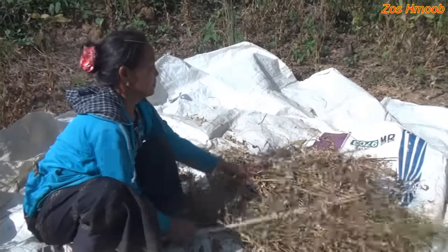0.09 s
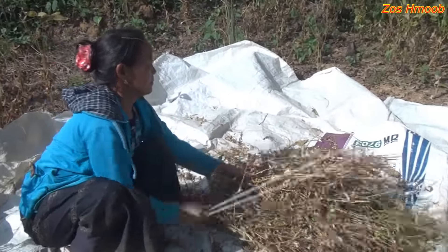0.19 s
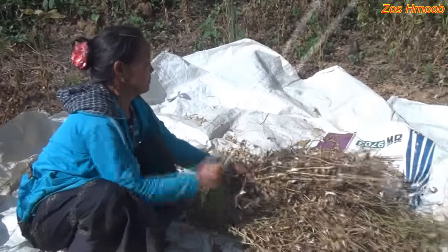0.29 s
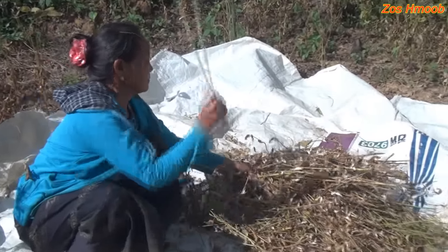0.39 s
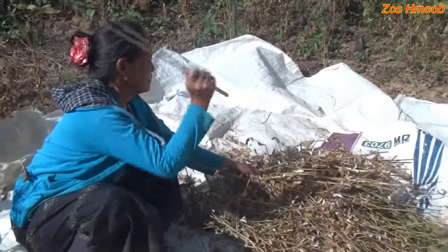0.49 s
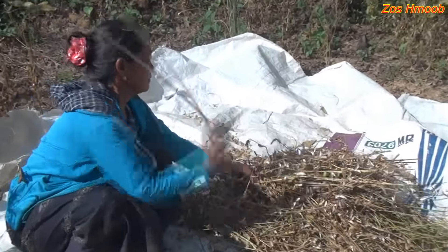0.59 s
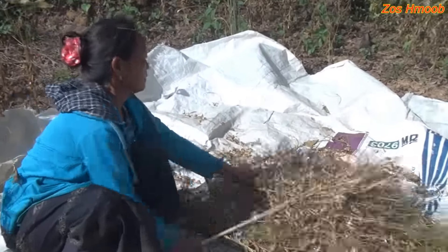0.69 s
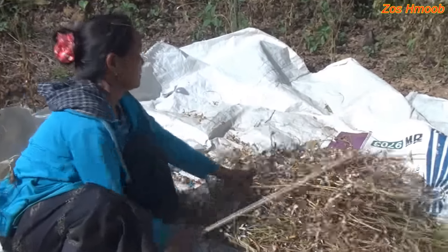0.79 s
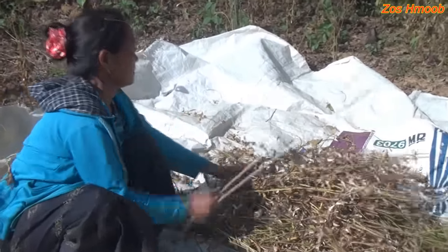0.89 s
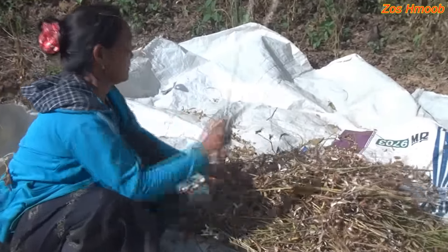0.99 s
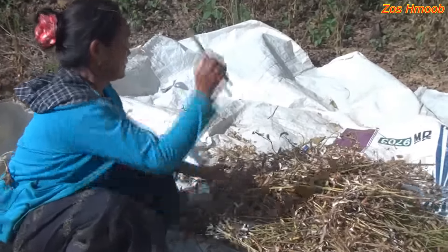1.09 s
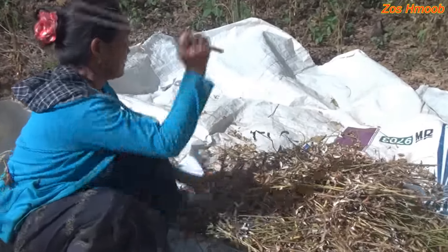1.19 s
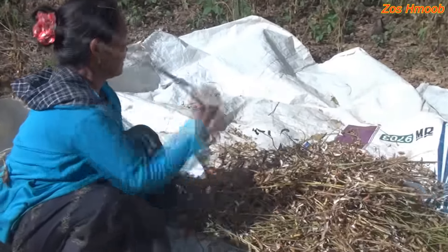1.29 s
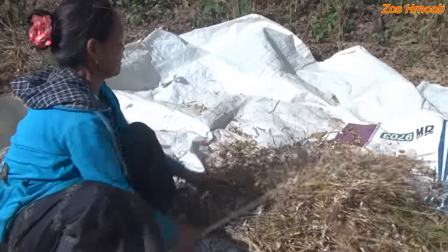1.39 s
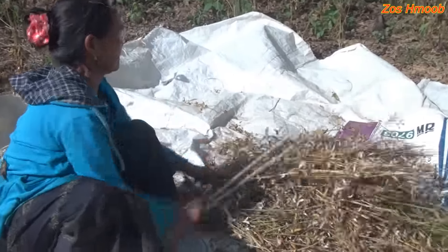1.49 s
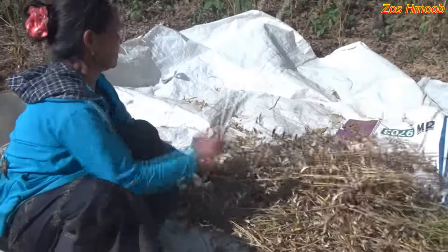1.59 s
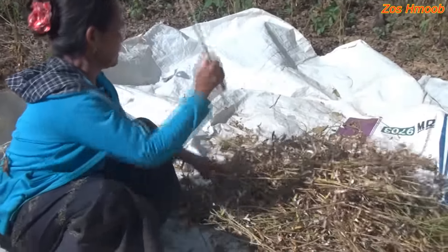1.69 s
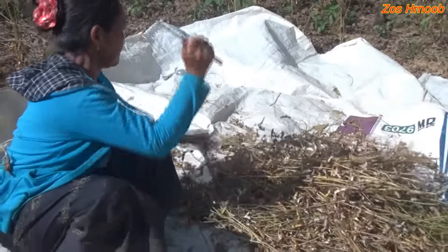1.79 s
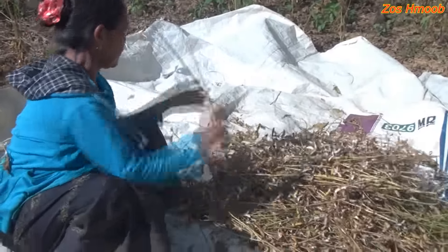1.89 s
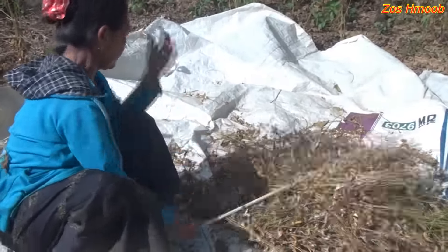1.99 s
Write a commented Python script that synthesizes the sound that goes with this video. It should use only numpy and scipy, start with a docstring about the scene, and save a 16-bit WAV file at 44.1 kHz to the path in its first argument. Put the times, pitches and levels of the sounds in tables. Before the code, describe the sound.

Sticks thresh a heap of dried stalks outdoors: brief swishes lead into three sharp, crackling blows, each trailing crunch, rattling pods and scattered ticks. Close stereo microphone, heap to the right, very soft open air behind.

```python
"""Dried stalks rustle and tick to the right, then two thin sticks swish down together three times on their heap
on a tarp. Each blow is a burst of dense random snaps over a dull noise thud, thinning into crunch and rattling
pods. Between blows, damped rings make single ticks and finer snaps make the rustle; a rough tone for each stick
makes the swish. An insect trills far off as a pulsed, roughened sine, over soft outdoor air of coloured noise."""
import sys
import numpy as np
from scipy import signal
from scipy.fft import rfft, irfft, next_fast_len
from scipy.io import wavfile
from scipy.ndimage import map_coordinates

SR = 44100
rng = np.random.default_rng(int(sys.argv[2]) if len(sys.argv) > 2 else 0)


def output_pcm(signal):
    """Save a mono or channel-first signal as 16-bit PCM at the path in sys.argv[1].

    Samples are clipped to [-1, 1] before scaling.
    """
    pcm = np.clip(np.atleast_2d(signal).T, -1, 1) * 32767
    wavfile.write(sys.argv[1], SR, np.round(pcm).astype(np.int16))


def convert_level_to_amplitude(level_db):
    """Map a level in decibels to its linear amplitude factor."""
    exponent = np.asarray(level_db, float) / 20
    return 10 ** exponent


N = 88200
T = np.arange(N) / SR

# Levels are those of the dry layers, before slow wavering and stereo placing; spectra are relative.
# contacts of the sticks with the heap: (time [s], level [dB], rise [s], burst t60 [s], low thud level [dB])
STICK_CONTACTS = [(0.21, -22.5, 0.00033, 0.011, -56), (0.2116, -13, 0.0011, 0.059, -39),
                  (0.2138, -15, 0.0013, 0.09, -48), (0.8215, -13.5, 0.0027, 0.047, -33.5),
                  (0.8245, -13.5, 0.0012, 0.066, -32), (1.537, -13, 0.0033, 0.063, -34),
                  (1.541, -18.5, 0.001, 0.058, -38), (1.552, -32, .004, 0.43, -28.5)]
# the heap crunching on after each blow: (time [s], level [dB], t60 [s])
HEAP_CRUNCH = [(0.215, -20, .25), (0.828, -22.5, 0.31), (1.543, -21.5, 0.22)]
# colour of the cracks in a burst: (frequency [Hz], density [dB per Hz])
CRACK_SPECTRUM = [(88, -54), (150, -63), (738, -12.5), (1360, -18.5), (3560, -5), (5480, -5), (9890, -2.5),
                  (13800, -5.5), (15600, -12.5), (16500, -43)]
# colour of the crunch: (frequency [Hz], density [dB per Hz])
CRUNCH_SPECTRUM = [(59, -48), (100, -12), (797, -5), (1370, -8), (1920, -3.5), (2630, -17.5), (2920, -5),
                   (7510, -6), (9260, -2), (15000, -13.5)]
# colour of the dull thud: (frequency [Hz], density [dB per Hz])
THUD_SPECTRUM = [(60, -7), (120, -8), (300, -21.5), (700, -4.5), (1500, -20.5), (3000, -69), (6000, -48)]
# swishes of the sticks through the air: (end time [s], length [s], level [dB], first pitch [Hz], last pitch [Hz])
STICK_SWISHES = [(0.214, 0.097, -47.5, 139.7, 261), (0.81, 0.0716, -42, 111.7, 275),
                 (1.543, 0.081, -39, 144.8, 268)]
# colour of the whoosh around the swish tones: (frequency [Hz], density [dB per Hz])
WHOOSH_SPECTRUM = [(80, -26), (150, -5.5), (300, -0.5), (500, -9), (800, -8), (1200, -11), (3000, -21.5),
                   (8000, -27), (15000, -36)]
# snaps and ticks: (time [s], level [dB], pitch [Hz], length [s], pitch spread to either side [octaves])
STALK_TICKS = [(.0066, -29, 9540, .002, 0.26), (0.0123, -27, 8900, 0.00054, 1.1),
               (0.024, -32, 10300, .0015, 0.25), (0.0345, -24.5, 8770, 0.0016, 0.23),
               (0.048, -31, 7240, 0.00076, 1.3), (0.055, -30, 9400, 0.0013, 0.74),
               (0.062, -28, 7150, 0.001, 0.2), (0.086, -33, 6500, 0.0022, 1.2),
               (0.092, -27, 7600, 0.0035, 0.84), (0.102, -31, 8750, 0.001, 0.3),
               (0.107, -28, 6530, 0.0032, 1.3), (.1205, -34, 5040, 0.0011, 0.32),
               (0.1415, -29, 7600, .002, 0.82), (0.265, -24.5, 5230, 0.0023, 0.33),
               (0.274, -29, 4260, 0.0016, 0.36), (0.311, -40, 4500, 0.006, 0.19),
               (0.3215, -36, 4460, .003, 0.23), (.33, -33, 10400, 0.0012, 0.15),
               (.3345, -31.5, 10200, .0015, 0.11), (0.34, -30, 10500, .0008, 0.23),
               (0.350, -38, 4140, 0.005, 0.15), (0.3735, -37.5, 5560, 0.0024, 0.64),
               (0.406, -33.5, 9800, 0.00092, 0.49), (0.5, -27, 4970, 0.0018, .22),
               (0.5025, -35.5, 4500, 0.0057, 0.17), (.5145, -36, 4470, 0.0017, .1),
               (0.529, -47.5, 4580, 0.003, .12), (.7215, -43, 4500, 0.0025, 1.04),
               (0.7294, -42, 5000, 0.0019, 0.94), (0.826, -11.5, 3660, 0.001485, 0.33),
               (0.8815, -21, 1960, 0.0015, 0.77), (0.9065, -26, 2160, 0.0019, 1.23),
               (0.9128, -33.5, 2340, 0.0024, 0.6), (0.961, -36.5, 4030, 0.0016, 1.65),
               (1.048, -40.5, 1780, 0.0019, 1.6), (1.117, -38.5, 5100, 0.0011, 0.61),
               (1.1424, -41.5, 2550, 0.0025, .7), (1.149, -41.5, 3460, .003, 0.36),
               (1.188, -41, 7800, 0.0026, 0.17), (1.232, -46, 4000, 0.00073, 0.98),
               (1.3255, -41, 4470, .002, 0.16), (1.333, -42.5, 4500, .007, 0.23),
               (1.333, -47.5, 1830, 0.0054, 0.096), (1.343, -49, 4600, 0.0044, 0.14),
               (1.353, -47, 4850, 0.0025, 0.27), (1.38, -50, 1700, 0.0052, 0.54),
               (1.405, -49, 3780, 0.0021, 0.56), (1.4165, -41, 1930, 0.0043, 0.88),
               (1.4336, -44, 2300, 0.0018, 0.24), (1.4432, -36, 2130, 0.0028, 0.67),
               (1.449, -39.5, 3700, 0.003, 0.77), (1.453, -38, 3540, 0.0058, 1.1),
               (1.5575, -28, 1190, 0.001, 1.1), (1.5611, -15.5, 1950, 0.00059, 1.14),
               (1.631, -25.5, 8550, 0.0029, 0.29), (1.625, -30, 6030, 0.0017, 0.54),
               (1.758, -46, 4170, 0.0025, 0.36), (1.777, -45, 4130, 0.0032, 0.11),
               (1.80, -45, 3630, 0.0029, 0.18), (1.821, -43.5, 3980, 0.0023, 0.44),
               (1.976, -49.5, 3500, 0.0011, 0.99)]
# loose stalks rustling and settling: (time [s], level [dB], treble raised and the rest lowered by [dB])
STALK_RUSTLE = [(0, -42.5, 4.5), (.1, -44, 3), (.15, -44.5, 0.5), (.17, -47.5, -0.5), (.21, -44.5, -5.5),
                (.33, -43.5, -0.5), (.42, -48.5, -3), (.49, -50, -1.5), (.55, -59, -7.5), (.7, -58.5, -6),
                (.728, -52, 5), (.75, -54, -8), (.82, -46, -4.5), (.96, -46.5, -4.5), (1.05, -50.5, -0.5),
                (1.09, -55.5, -4.5), (1.15, -55, -8.5), (1.25, -53, 2.5), (1.3, -57, -3.5),
                (1.37, -59, -8.5), (1.39, -49, -1), (1.43, -52.5, -4.5), (1.456, -46.5, -4),
                (1.47, -54.5, -4.5), (1.54, -54.5, 0), (1.65, -57.5, -16.5), (1.72, -50, -3.5),
                (1.819, -51.5, -0.5), (1.86, -58, 0.5), (2, -71, -14)]
# colour of the rustle: (frequency [Hz], density [dB per Hz])
STRAW_SPECTRUM = [(120, -18), (200, -13), (364, -4), (615, -9), (807, -7.5), (3630, -4.5), (6730, -5),
                  (7770, -3), (12500, -4.5), (15200, -11)]
# swell of the nearer insect: (time [s], level [dB])
INSECT_LEVEL = [(0, -76), (.5, -60.5), (.8, -67.5), (1.1, -66), (1.5, -64), (1.7, -64), (1.85, -70),
                (2, -84)]
# colour of the outdoor air: (frequency [Hz], density [dB per Hz])
AIR_SPECTRUM = [(15, -45), (25, 2), (320, -2.5), (774, 2), (885, 0), (1160, -2), (1360, -4.5), (2200, -3.5),
                (6270, -9.5), (7170, -8), (15200, -17)]
# likeness of left and right in the air: (frequency [Hz], correlation [-1 to 1])
AIR_LIKENESS = [(60, 0.94), (240, 0.61), (950, -0.2), (3770, -0.0016), (15000, 0.85)]
# balance of the air: (frequency [Hz], left over right [dB])
AIR_BALANCE = [(60, -9), (240, -14), (950, -1.5), (3770, 4.5), (15000, -13)]
# balance of the heap: (frequency [Hz], left over right [dB])
HEAP_BALANCE = [(60, -9), (130, -16.5), (290, -11.5), (640, -10.5), (1410, -5), (3100, -4), (6820, -4.5),
                (15000, -13)]
# phase of the heap: (frequency [Hz], left ahead of right [radians])
HEAP_PHASE = [(0, -0.31), (1120, 0.09), (1810, 0.49), (2580, -0.44), (2930, -0.26), (8530, -0.61),
              (9040, -0.95), (11800, -0.023), (16400, -0.16)]
# likeness of left and right in the heap: (frequency [Hz], correlation [-1 to 1])
HEAP_LIKENESS = [(100, 1), (1000, 0.59), (10000, 0.93)]


def unit(x):
    """Scales a signal to rms 1."""
    return x / np.sqrt(np.mean(x ** 2) + 1e-20)


def along(points, hz):
    """Reads a curve of (frequency, value) points on a log frequency axis."""
    f, v = np.transpose(points)
    return np.interp(np.log(hz + 1), np.log(f + 1), v)


def filtered(x, response):
    """Multiplies the spectrum of x by a response of frequency."""
    m = next_fast_len(N + 8192)
    return irfft(rfft(x, m) * response(np.fft.rfftfreq(m, 1 / SR)), m)[..., :N]


def coloured(x, spectrum):
    """Gives a flat signal the colour of a spectrum, at rms 1."""
    return unit(filtered(x, lambda hz: convert_level_to_amplitude(along(spectrum, hz))))


def wobble(rate):
    """A smooth random curve, rate knots a second."""
    return map_coordinates(rng.standard_normal(int(2 * rate) + 4), [T * rate])


def envelope(start, db, rise_s, t60):
    """A swell from the start time under an exponential fall."""
    u = np.maximum(T - start, 0)
    swell = 1 - np.exp(-(u / max(rise_s, 1e-4)) ** 2)
    return convert_level_to_amplitude(db - 60 * u / max(t60, .003)) * swell


def rings(start, size, hz, cycles, length=160):
    """Sums damped sines with a soft start, each dying over so many cycles and cut at length samples."""
    k = np.arange(int(length))
    turns = hz[:, None] * k / SR
    life = turns / np.reshape(cycles, (-1, 1))
    wave = size[:, None] * np.sin(2 * np.pi * turns) * np.e * life * np.exp(-life)
    at = (start * SR).astype(int)[:, None] + k
    return np.bincount(at.ravel(), wave.ravel(), N + 2000)[:N]


def crackle(spectrum, count, spread_db, cycles, hiss):
    """Two streams of tiny snaps of uneven size, flattened, mixed with hiss and coloured to rms 1."""
    pair = []
    for _ in range(2):
        place, luck, p = rng.random((3, count))
        size = convert_level_to_amplitude(-spread_db * np.log(luck + 0.037))  # few large, many small
        snaps = rings(place * N / SR, size, 1200 * 12 ** p, cycles, length=62)
        f, power = signal.welch(snaps, SR, nperseg=64)
        snaps = filtered(snaps, lambda hz: 1 / np.sqrt(np.interp(hz, f, power) + 1e-12))
        pair.append(unit(snaps) + hiss * rng.standard_normal(N))
    return coloured(np.array(pair), spectrum)


def placed(pair, alike, left_db, lead):
    """Mixes a main and a stray stream to left and right with likeness, balance and phase lead."""
    def response(hz):
        turn = np.arccos(np.clip(along(alike, hz), -1, 1)) / 2
        g = convert_level_to_amplitude(along(left_db, hz) / 2) * np.exp(.5j * along(lead, hz))  # half the offset to each side
        norm = 2 / np.abs(g + 1 / g).clip(1)
        left = [np.cos(turn) * g, np.sin(turn) * g]
        right = [np.cos(turn) / g, -np.sin(turn) / g]
        return norm * np.array([left, right])
    return filtered(pair[None], response).sum(1)


def pods():
    """Hollow pods rattle as scattered rings from 2.4 to 7.2 kHz, two streams at rms 1."""
    place, luck, p = rng.random((3, 2, 4000))
    size = convert_level_to_amplitude(-3 * np.log(luck + .05))
    pair = [rings(place[k] * N / SR, size[k], 2400 * 3 ** p[k], 1.6) for k in range(2)]
    return unit(np.array(pair))


def blows():
    """Each contact bursts into cracks over a dull thud; the heap crunches on and hollow pods rattle in it."""
    pods_db = -7  # against the crunch
    burst = sum(envelope(s, db, rise, t60) for s, db, rise, t60, _ in STICK_CONTACTS)
    low = sum(envelope(s, db, 0.0023, 0.048) for s, _, _, _, db in STICK_CONTACTS)
    after = sum(envelope(s, db, 0.011, t60) for s, db, t60 in HEAP_CRUNCH)
    thud = coloured(rng.standard_normal((2, N)), THUD_SPECTRUM)
    cracks = crackle(CRACK_SPECTRUM, count=16000, spread_db=2.5, cycles=0.57, hiss=0.48)
    crunch = crackle(CRUNCH_SPECTRUM, count=9000, spread_db=2.5, cycles=0.76, hiss=1.0)
    uneven = convert_level_to_amplitude(1.6 * wobble(140))
    return burst * cracks + low * thud + after * (uneven * crunch + convert_level_to_amplitude(pods_db) * pods())


def swish():
    """Two sticks each shed a rough tone that rises with their speed, with a whoosh around them."""
    rough, hiss_db = .5, -5  # phase wander [radians], whoosh against the tones [dB]
    second_pitch, second_db = .6, -9  # the second stick sheds a lower, fainter tone
    whoosh = coloured(rng.standard_normal((2, N)), WHOOSH_SPECTRUM)
    out = np.zeros((2, N))
    for end, length, db, first_hz, last_hz in STICK_SWISHES:
        u = np.clip(1 - (end - T) / length, 0, 1)
        stop = np.exp(-(np.maximum(T - end + 0.0046, 0) / 0.0077) ** 2)
        loud = convert_level_to_amplitude(db) * u ** 2.3 * stop
        hz = first_hz + (last_hz - first_hz) * np.sin(np.pi / 2 * u)
        phase = 2 * np.pi * np.cumsum(hz) / SR
        first = np.sin(phase + rough * wobble(70))
        second = convert_level_to_amplitude(second_db) * np.sin(second_pitch * phase + rough * wobble(70))
        tone = np.sqrt(2) * (first + second) * convert_level_to_amplitude(3.1 * wobble(49.93))
        out += loud * (tone * [[1], [.3]] + convert_level_to_amplitude(hiss_db) * whoosh)  # less tone in the stray stream
    return out


def ticks():
    """Stalks snap and seeds hit the tarp: a broad snap, then a fading cluster of seven rings around the pitch."""
    ring_life = 0.26  # life of one ring over the length of the tick
    snap_db, snap_pitch = -2, 1.2  # the opening snap, against the level and pitch of the tick
    s, db, hz, length, spread = np.repeat(np.transpose(STALK_TICKS), 7, axis=1)
    # pitches evenly fill the spread; two rings start early, the rest follow at scattered delays
    late_slot = np.tile([0, 0, 1, 2, 3, 4, 6], len(STALK_TICKS))
    pitch_slot = np.tile([3, 5, 1, 4, 0, 6, 2], len(STALK_TICKS))
    late, detune = rng.random((2, len(s)))
    late = (late_slot + late) / 7
    detune = (pitch_slot + detune - 3.5) / 3.5
    pitch = np.clip(hz * 2 ** (spread * detune), 300, 15000)
    cycles = np.clip(ring_life * length * pitch, .35, 1.08 / np.clip(spread, .08, 2))
    cluster = rings(s + length * late, convert_level_to_amplitude(db - 5.5 - 5.5 * late), pitch, cycles, length=340)
    snap_hz = np.clip(snap_pitch * hz[::7], 300, 11000)
    x = cluster + rings(s[::7], convert_level_to_amplitude(db[::7] + snap_db), snap_hz, 0.33, length=64)
    return np.array([x, np.roll(x, 17) * 0.55])  # the stray stream is a late, softer copy


def rustle():
    """Scattered small snaps of loose stalks, brighter or duller as they move."""
    s, db, tilt = np.transpose(STALK_RUSTLE)
    straw = crackle(STRAW_SPECTRUM, count=6000, spread_db=4.5, cycles=2.6, hiss=1.17)
    dull = filtered(straw, lambda hz: 1 / (1 + (hz / 5000) ** 2))
    lean = np.interp(T, s, tilt)
    loud = convert_level_to_amplitude(np.interp(T, s, db) + 1.3 * wobble(60.3))
    return loud * (dull * convert_level_to_amplitude(-lean) + (straw - dull) * convert_level_to_amplitude(lean))


def insect():
    """A rough whine pulsed unevenly about thirty times a second, and a fainter, higher one without pulses."""
    near_hz, trills_per_s = 7170, 29
    far_hz, far_db = 8520, -75.5

    def buzz(hz):
        """A sine whose phase jitters on its own in each channel."""
        rough = .95 * np.array([wobble(550), wobble(500)])  # radians
        return np.sqrt(2) * np.sin(2 * np.pi * hz * T + rough)
    gate = 1 + .5 * np.sin(2 * np.pi * trills_per_s * T + 4.4 + .3 * wobble(12))
    near_db = np.interp(T, *np.transpose(INSECT_LEVEL)) + .7 * wobble(8) + 2.5 * wobble(250)
    return convert_level_to_amplitude(near_db) * gate * buzz(near_hz) + convert_level_to_amplitude(far_db + 2 * wobble(30)) * buzz(far_hz)


def air():
    """Soft outdoor hiss and far rumble: coloured noise, wavering a little."""
    level_db = -58.5
    x = coloured(rng.standard_normal((2, N)), AIR_SPECTRUM)
    return convert_level_to_amplitude(level_db + 0.2 * wobble(7.2)) * placed(x, AIR_LIKENESS, AIR_BALANCE, [(100, 0)])


def scene():
    """Sets the heap to the right, with the insect and the air around it."""
    heap = blows() + swish() + ticks() + rustle()
    return placed(heap, HEAP_LIKENESS, HEAP_BALANCE, HEAP_PHASE) + insect() + air()


def roll_off(x):
    """The treble ends steeply here."""
    return signal.sosfilt(signal.butter(12, 16800, fs=SR, output="sos"), x)


def record(dry):
    """The microphone saturates on the highest peaks and drops the deep bass; the mix is then band-limited."""
    saturates_at, low_hz, top_hz = .97, 58.6, 15900
    held = dry / (1 + np.abs(dry / saturates_at) ** 4) ** (1 / 4)
    mix = filtered(held, lambda hz: (1j * hz / (low_hz + 1j * hz)) ** 3 * (hz < top_hz))
    return roll_off(mix)


dry = scene()
out = record(dry)
output_pcm(out)
```